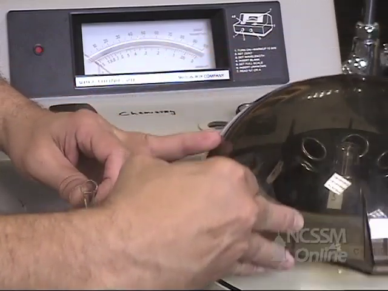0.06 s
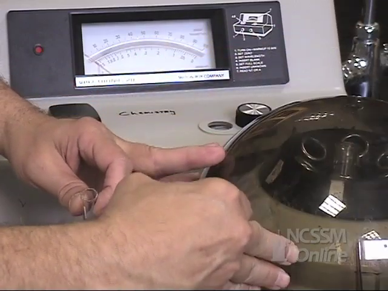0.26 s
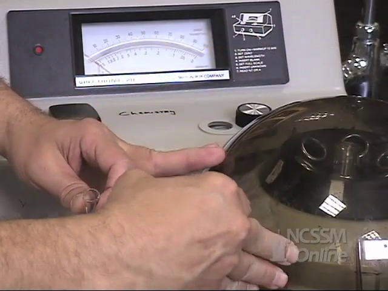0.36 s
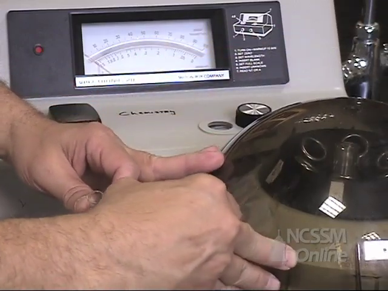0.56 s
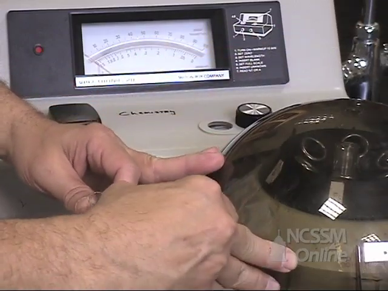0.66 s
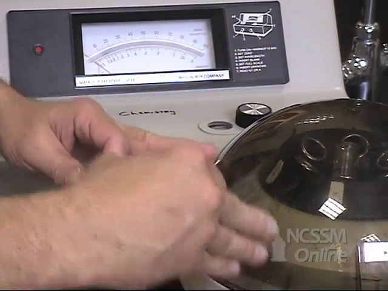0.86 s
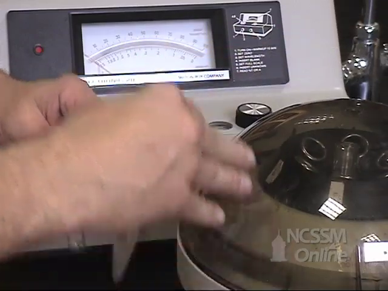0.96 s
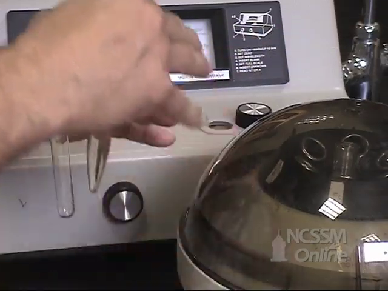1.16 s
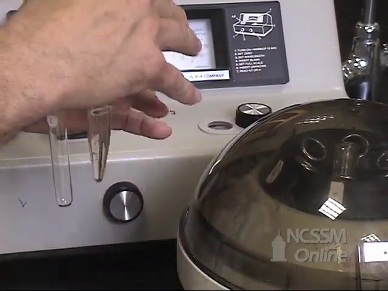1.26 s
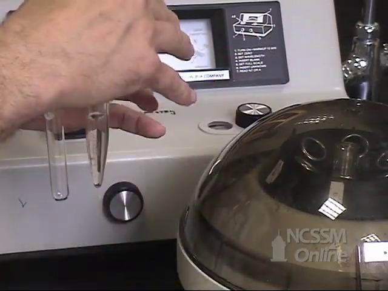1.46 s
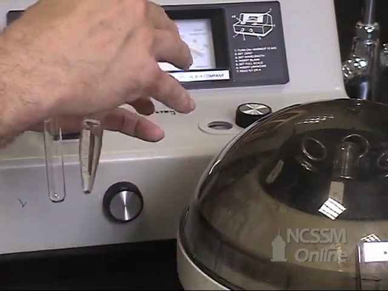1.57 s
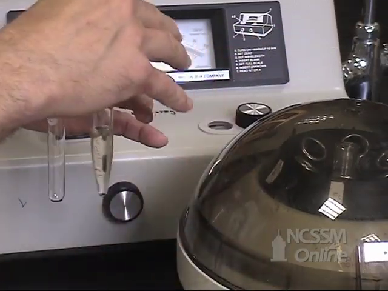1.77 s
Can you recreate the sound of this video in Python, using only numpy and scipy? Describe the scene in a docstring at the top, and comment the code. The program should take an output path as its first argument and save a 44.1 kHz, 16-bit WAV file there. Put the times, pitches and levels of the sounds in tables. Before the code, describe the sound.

A plastic lid snaps sharply twice in quick succession, then knocks dully, over a low motor hum

```python
"""The plastic lid of a bench machine snaps twice and later, held by the hand, knocks on its housing:
pushes and short rattles ring decaying modes under a broad crack, and low bench modes thud.
Glass tubes tick faintly in the fingers (double resonances). A fan motor hums (narrow noise, tones)
over ventilation noise and hiss (flickering noise bands). The room adds dense decaying reflections."""
import sys
import numpy as np
from scipy import signal
from scipy.io import wavfile

SR = 44100
rng = np.random.default_rng(int(sys.argv[2]) if len(sys.argv) > 2 else 0)


def generate_wav(signal):
    """Clip the signal to [-1, 1] and save it as 16-bit WAV at the path in sys.argv[1]."""
    frames = np.transpose(np.atleast_2d(signal))
    scaled = np.clip(frames, -1, 1) * 32767
    pcm = np.round(scaled).astype(np.int16)
    wavfile.write(sys.argv[1], SR, pcm)


def gain_from_db(level_db):
    """Turn a decibel level (scalar or array-like) into a linear amplitude factor."""
    decades = np.asarray(level_db, float) / 20
    return 10 ** decades


N = 79380

# Fan motor multiples: multiple of turning rate, level/dB rms, width/Hz
MOTOR_MULTIPLES = [(1, -52, 6.6), (3, -52.5, 18), (5, -52.5, 15), (6, -55, 10.3), (8, -55.5, 18),
                   (9, -53.5, 24)]
# Strongest motor multiple, wavering: t/s, level/dB rms
BLADE_LEVEL = [(0, -45.5), (.17, -43.5), (.33, -36.5), (.38, -33), (.58, -43.5), (.78, -49), (.98, -38.5),
               (1.04, -41), (1.29, -40), (1.53, -42), (1.6, -52), (1.65, -47.5), (1.8, -42)]
# Steady electric tones: f/Hz, level/dB rms
ELECTRIC_TONES = [(120, -55), (15734, -86)]
# Relative spectrum of ventilation and hiss: f/Hz, density/dB per Hz
AIR_SPECTRUM = [(15, 5), (30, -11), (55, 10.5), (80, -18.5), (200, -0.5), (500, -14.5), (650, -14.5),
                (1500, -22), (4700, -36.5), (8000, -41), (16000, -41)]
# Glass ticks: t/s, peak level/dB, f/Hz, t60/s of each of two resonances
GLASS_TICKS = [(0.071, -47.5, 1700, 0.015), (1.2676, -37, 5100, 0.0012), (1.288, -51, 4050, .003),
               (1.2923, -40.5, 4350, 0.0019), (1.3048, -59, 4900, .003), (1.3952, -37.5, 3900, 0.0025),
               (1.455, -51, 3200, 0.0033), (1.5124, -45, 3500, 0.0018)]
# Room decay: f/Hz, t60/s
ROOM_DECAY = [(300, 1), (1700, 0.4), (5000, 0.49), (9000, 0.26)]
# Modes of lid and housing before hand and mount damping: f/Hz, relative level/dB, t60/s
LID_MODES = [(206.6, -12.5, 0.3), (220, 4, 0.088), (354.4, -12, 0.13), (558.3, -7.5, .09),
             (624, -13.5, 0.07), (690, -37, 0.24), (1157, -7.5, 0.048), (1539, 1, 0.032), (1642, 1, 0.043),
             (1700, 4.5, 0.013), (1757, -8.5, .07), (1877, -9, 0.1), (2223, -13, 0.12), (2750, -34, 0.039),
             (3039, -9, 0.056), (3500, -12.5, 0.0083), (3930, -11, 0.094), (4380, -8.5, 0.021),
             (4760, -11, 0.019), (5156, -9.5, 0.038), (5700, -29, 0.012), (6410, -7, 0.013),
             (7670, -42, 0.074), (8100, -36, .02)]
# Centres of the four lid level zones: f/Hz
LID_ZONES_HZ = [250, 600, 1600, 5000]
# Contacts of the free lid: t/s, relative level/dB in each of the four zones, rattle time constant/s
SNAP_CONTACTS = [(.207, -60, -38, -45, -55, 0.0032), (.219, -53, -62, -42, -47.5, 0.0046),
                 (.2358, -30.5, -20, -33, -34, 0.0021), (.2392, -23.5, -24, -19, -22.5, 0.0016),
                 (.2470, -16.5, -16.5, -22.5, -24.5, 0.0067), (.2678, -31, -67, -52, -15.5, 0.0014),
                 (.2705, -13.5, -10, -20, -18.5, 0.003696), (.2915, -26, -50, -35, -34.5, 0.0077)]
# Contacts of the knock, lid damped by the hand: same columns
KNOCK_CONTACTS = [(.6145, -22.5, -41, -37, -49, 0.0026), (.6222, -8, -15.5, -21.5, -24, 0.0034),
                  (.6275, -27.5, -53, -27.5, -36.5, 0.0043)]
# Pushes into the bench: t/s, relative level/dB
BENCH_PUSHES = [(0.277, -25), (0.322, -32), (.6420, -10.5), (0.717, -25)]
# Modes of the bench: f/Hz, relative level/dB, t60/s
BENCH_MODES = [(52.3, -32, 0.58), (114, -5.5, 0.13), (190, -13, 0.17)]

MOTOR_HZ, BLADE_MULTIPLE = 55.78, 4
BLADE_ROUGH_DB, BLADE_WIDTH_HZ = -11.5, 2.7
AIR_RMS_DB, AIR_FLICKER_DB, AIR_FLICKER_HZ = -44, 1.0, 14
ROOM_SNAP_DB, ROOM_KNOCK_DB, ROOM_RISE_S, ROOM_LOW_CUT_HZ = -12.5, -12.5, 0.0027, 387
GRAINS_PER_S, RATTLE_LOW_CUT_HZ, MODE_SPREAD_DB = 4700, 1200, 3.5
CLICK_SHARE = 0.62   # against a rattle of unit energy
LID_PUSH_S, PUSHED_BELOW_HZ, BENCH_PUSH_S = 0.0012, 750, 0.0013
CRACK_DB, EDGE_DB = 9, -13   # relative to the top zone
CRACK_LOW_CUT_HZ, LID_LOW_CUT_HZ, LID_TOP_HZ = 1860, 259, 8300
CRACK_FULL_TOP_HZ, EDGE_FULL_TOP_HZ = 6940, 19000   # before the brightness share
# shares of mode t60 and of crack and edge bandwidth
FREE_RING, FREE_BRIGHT = 0.76, 0.95
HELD_RING, HELD_BRIGHT = 0.36, 0.86
TOP_CUT_HZ = 15850


def butter(x, order, hz, kind="low"):
    """Butterworth filter, maximally flat in its passband."""
    return signal.sosfilt(signal.butter(order, hz, kind, fs=SR, output="sos"), x)


def rms_one(x):
    """Scale to rms 1."""
    return x / np.sqrt(np.mean(x ** 2) + 1e-20)


def ring(drive, hz, t60_s):
    """Two-pole resonance: a unit click rings a decaying sine of initial height 1."""
    r = gain_from_db(-60 / (t60_s * SR))
    w = 2 * np.pi * hz / SR
    return signal.lfilter([0, np.sin(w)], [1, -2 * r * np.cos(w), r * r], drive + 1e-18)


def narrow(hz, width_hz):
    """Noise through one resonance, rms 1; the first second is build-up, dropped."""
    t60_s = np.log(1000) / (np.pi * width_hz)
    return rms_one(ring(rng.standard_normal(N + SR), hz, t60_s)[SR:])


def drift(rate_hz):
    """Slow random wander of rms 1: noise through two equal poles, at SR / 40."""
    r = np.exp(-2 * np.pi * rate_hz * 40 / SR)
    noise = rng.standard_normal(N // 40 + 2002)
    slow = signal.lfilter([1], [1, -2 * r, r * r], noise)[2000:]
    return np.interp(np.arange(N) / 40, np.arange(len(slow)), rms_one(slow - slow.mean()))


def bump(length_s):
    """Soft push of unit area: a squared half sine."""
    phase = np.minimum(np.arange(600) / SR / length_s, 1)
    push = np.sin(np.pi * phase) ** 2
    return push / push.sum()


def half_octaves(white, edges_hz):
    """Split noise into half-octave bands, alternating two independent sources; yields centre/Hz, band."""
    for k, (low, high) in enumerate(zip(edges_hz, edges_hz[1:])):
        yield np.sqrt(low * high), butter(white[k % 2], 2, [low, high], "band")


def motor():
    """Rotation gives wavering multiples of the turning rate, one nearly pure; electric tones are steady."""
    t = np.arange(N) / SR
    out = sum(gain_from_db(db) * narrow(k * MOTOR_HZ, width_hz) for k, db, width_hz in MOTOR_MULTIPLES)
    blade_hz = BLADE_MULTIPLE * MOTOR_HZ
    blade = np.sqrt(2) * np.sin(2 * np.pi * blade_hz * t)
    blade += gain_from_db(BLADE_ROUGH_DB) * narrow(blade_hz, BLADE_WIDTH_HZ)
    out += gain_from_db(np.interp(t, *np.transpose(BLADE_LEVEL))) * blade
    for hz, db in ELECTRIC_TONES:
        out += gain_from_db(db) * np.sqrt(2) * np.sin(2 * np.pi * hz * t)
    return out


def air():
    """Ventilation and hiss: broadband noise whose half-octave bands flicker independently."""
    out = 0
    white = rng.standard_normal((2, N + 8000))
    hz_pts, db_pts = np.transpose(AIR_SPECTRUM)
    for hz, band in half_octaves(white, 20 * 2 ** np.arange(0, 10.1, 0.5)):
        db = np.interp(np.log(hz), np.log(hz_pts), db_pts)
        out = out + band[8000:] * gain_from_db(db + AIR_FLICKER_DB * drift(AIR_FLICKER_HZ))
    return gain_from_db(AIR_RMS_DB) * rms_one(out)


def tubes():
    """Glass tick: one resonance applied twice softens the touch."""
    out = np.zeros(N)
    for s, db, hz, t60_s in GLASS_TICKS:
        i = int(s * SR)
        tick = ring(ring(np.arange(4000) == 0, hz, t60_s), hz, t60_s)
        out[i:i + 4000] += gain_from_db(db) * tick / np.abs(tick).max()
    return out


def room(x):
    """Dense reflections: noise dying band by band, convolved with the sound."""
    t = np.arange(SR) / SR
    response = 0
    hz_pts, t60_pts = np.transpose(ROOM_DECAY)
    white = rng.standard_normal((2, SR))
    for hz, band in half_octaves(white, 250 * 2 ** np.arange(0, 6.1, 0.5)):
        t60_s = np.interp(np.log(hz), np.log(hz_pts), t60_pts)
        response = response + gain_from_db(-60 * t / t60_s) * band
    response = response * (1 - np.exp(-t / ROOM_RISE_S))
    response /= np.sqrt(np.sum(response ** 2))
    wet = signal.fftconvolve(x, response)[:N]
    return butter(wet, 1, ROOM_LOW_CUT_HZ, "high")


def rattle(shape, length_s):
    """Random short impacts under a dying envelope, plus one click a third of a time constant in."""
    hits = rng.random(len(shape)) < GRAINS_PER_S / SR
    grains = hits * rng.standard_normal(len(shape)) * shape
    grains /= np.sqrt(np.sum(grains ** 2))
    grains[int(length_s * SR / 3)] += CLICK_SHARE
    return butter(grains, 2, RATTLE_LOW_CUT_HZ, "high")


def lid(contacts, ring_share, bright):
    """Each contact pushes the low modes once and rattles the higher ones; a crack and sharp edge ride on it."""
    t = np.arange(3000) / SR
    out = np.zeros(N)
    for s, *zones_db, length_s in contacts:
        i = int(s * SR)
        shape = np.sqrt(t / length_s + 0.036) * np.exp(-t / length_s)
        grains = rattle(shape, length_s)
        body = np.zeros(N - i)
        for k, (hz, mode_db, t60_s) in enumerate(LID_MODES):
            # rattled modes alternate in sign
            drive = bump(LID_PUSH_S) if hz < PUSHED_BELOW_HZ else grains * (-1) ** k
            drive = np.pad(drive, (0, N - i - len(drive)))
            zone_db = np.interp(np.log(hz), np.log(LID_ZONES_HZ), zones_db)
            db = mode_db + zone_db + MODE_SPREAD_DB * rng.standard_normal()
            body += gain_from_db(db) * ring(drive, hz, t60_s * ring_share)
        noise = shape * rng.standard_normal(len(t))
        crack = butter(noise, 2, CRACK_LOW_CUT_HZ, "high")
        crack = butter(crack, 4, CRACK_FULL_TOP_HZ * bright)
        body[:len(t)] += gain_from_db(zones_db[-1] + CRACK_DB) * crack
        out[i:] += butter(body, 3, LID_TOP_HZ)
        edge = butter(noise * shape, 2, EDGE_FULL_TOP_HZ * bright)
        out[i:i + len(t)] += gain_from_db(zones_db[-1] + EDGE_DB) * edge
    return butter(out, 2, LID_LOW_CUT_HZ, "high")


def bench():
    """Soft pushes ring the low modes of the bench."""
    pushes = np.zeros(N)
    for s, db in BENCH_PUSHES:
        i = int(s * SR)
        pushes[i:i + 600] += gain_from_db(db) * bump(BENCH_PUSH_S)
    return sum(gain_from_db(db) * ring(pushes, hz, t60_s) for hz, db, t60_s in BENCH_MODES)


def scene():
    """All sources; lid and tubes also excite the room."""
    snaps = lid(SNAP_CONTACTS, FREE_RING, FREE_BRIGHT) + tubes()
    knock = lid(KNOCK_CONTACTS, HELD_RING, HELD_BRIGHT)
    wet = room(gain_from_db(ROOM_SNAP_DB) * snaps + gain_from_db(ROOM_KNOCK_DB) * knock)
    mix = motor() + air() + snaps + knock + bench() + wet
    return mix[None]


def band_limit(x):
    """A steep low-pass at the top of the band."""
    return signal.sosfilt(signal.butter(12, 16430, fs=SR, output="sos"), x)


def record(dry):
    """Steep elliptic low-pass: 1 dB ripple, 50 dB stopband."""
    top_cut = signal.ellip(10, 1, 50, TOP_CUT_HZ, fs=SR, output="sos")
    return band_limit(signal.sosfilt(top_cut, dry))


dry = scene()
out = record(dry)
generate_wav(out)
```